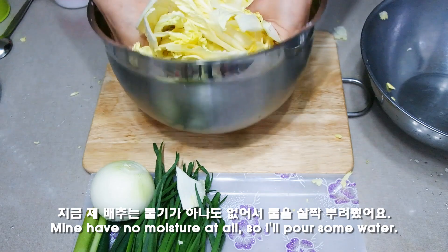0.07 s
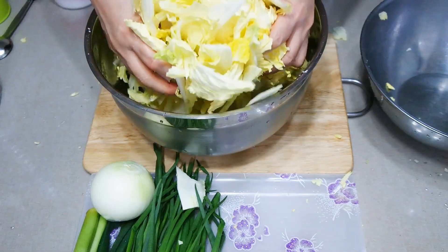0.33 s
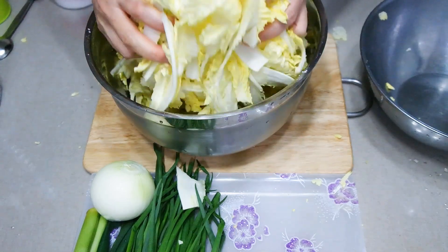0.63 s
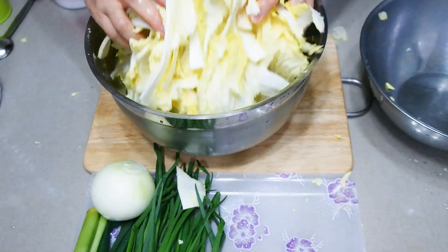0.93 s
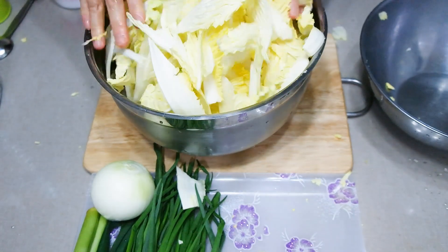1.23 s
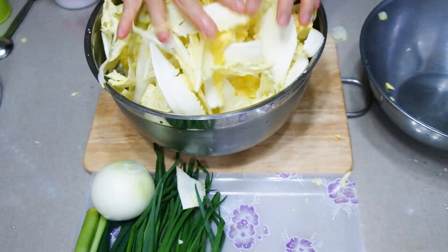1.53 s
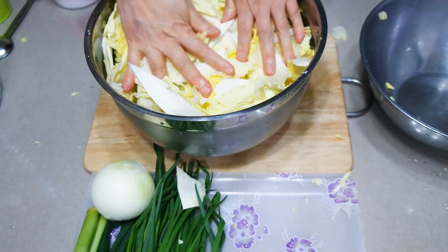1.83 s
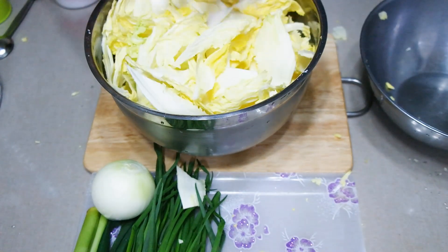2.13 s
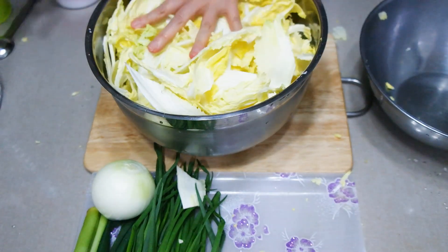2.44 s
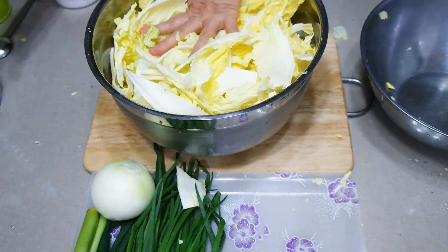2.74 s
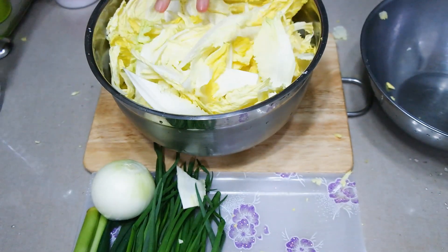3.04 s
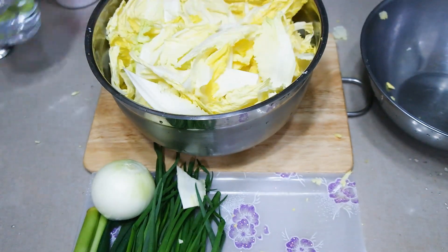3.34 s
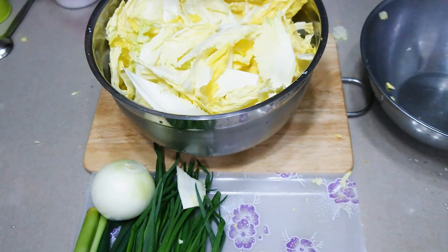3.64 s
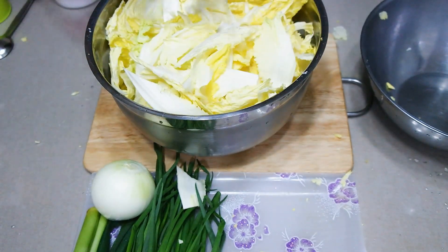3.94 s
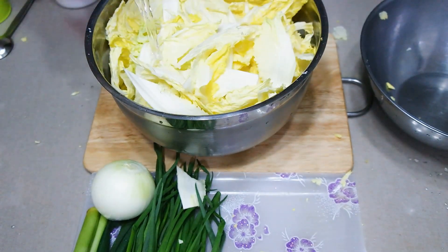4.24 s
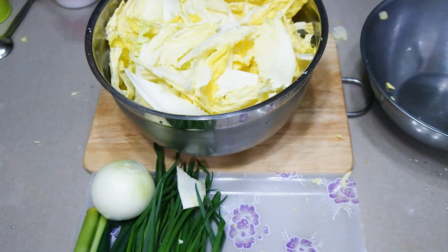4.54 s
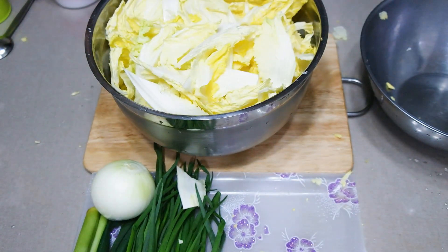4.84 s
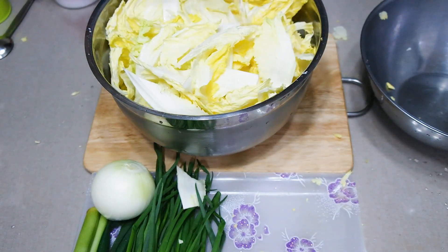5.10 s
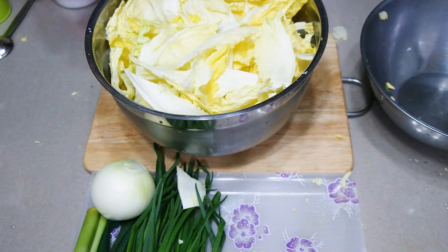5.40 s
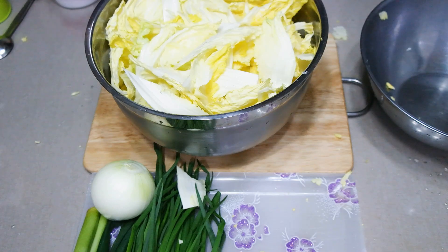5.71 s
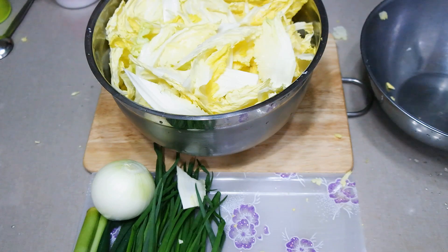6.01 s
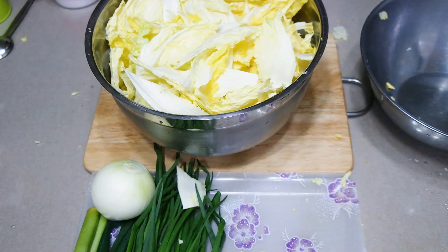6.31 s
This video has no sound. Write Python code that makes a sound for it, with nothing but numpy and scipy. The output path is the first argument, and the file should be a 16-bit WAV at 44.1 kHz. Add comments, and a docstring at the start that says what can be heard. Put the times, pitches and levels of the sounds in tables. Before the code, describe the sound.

Hands toss and press crisp cabbage in a thudding steel bowl, then water patters softly over the leaves and a glass is set down.

```python
"""A small, hard kitchen, heard from near the worktop on two closely spaced microphones.
Hands turn and press cut cabbage in a steel bowl, which thuds on its wooden board; kitchenware clacks,
a cup knocks, and the sound cuts off. Water is dribbled over the leaves, a tub is nudged along
and a glass set down. The walls answer each sound; farther back an appliance hums in the room air."""
import sys
import numpy as np
from scipy import signal
from scipy.fft import rfft, irfft
from scipy.io import wavfile

SR = 44100
rng = np.random.default_rng(int(sys.argv[2]) if len(sys.argv) > 2 else 0)


def store_pcm(level_fs):
    """Save levels as 16-bit WAV."""
    pcm = np.round(np.clip(level_fs, -1, 1) * 32767).astype(np.int16)
    wavfile.write(sys.argv[1], SR, np.atleast_2d(pcm).T)


N = 284974
TIME = np.arange(N) / SR
CUT_S = 3.607

# strokes of the hands: (start [s], rise [s], length [s], level [dB], easing [dB/s], rub over crunch [dB])
HAND_STROKES = [(-0.02, 0.014, 0.06, -36.5, 21.5, -9), (0.062, 0.08, 0.48, -33, 23.5, -9),
                (0.545, 0.028, 0.32, -40.5, -2, -12), (0.857, 0.12, 0.22, -36, -33, -14.5),
                (1.086, 0.021, 0.4, -35, 56.5, -12), (1.585, 0.22, 0.29, -30, 69, -12),
                (1.902, 0.028, 0.14, -35.5, 79, -12.5), (2.323, 0.026, 0.15, -48, 37, -10.5),
                (2.429, 0.069, 0.2, -38, 6, -8.5), (2.611, 0.062, 0.17, -30, 126, -9),
                (2.812, 0.044, .13, -38, 2, -7), (2.973, 0.047, 0.16, -46, 45, -4),
                (3.157, 0.018, 0.054, -43.5, 100, -3.5)]
# leaf ribs snapping: (time [s], relative level [dB], pitch [Hz])
RIB_SNAPS = [(0.597, -23, 6940), (0.835, -25.5, 8200), (1.031, -16.5, 9600), (1.548, -30, 9400),
             (1.857, -20.5, 4180), (2.345, -31, 2860), (2.646, -20, 2100), (2.763, -23.5, 5560),
             (2.843, -22, 1070), (3.053, -31, 5970), (3.084, -23, 7450), (3.094, -26, 11400),
             (3.172, -23.5, 8440), (3.244, -13.5, 12900), (3.404, -20.5, 11370)]
# large drops landing: (time [s], relative level [dB], pitch [Hz])
WATER_DROPS = [(3.86, -40.5, 10000), (3.935, -39, 12550), (3.985, -30, 12800), (4.171, -34, 11800),
               (4.19, -35.5, 6750), (4.349, -37, 4440), (4.667, -30, 13000), (4.827, -27, 11800),
               (4.871, -32.5, 12500), (4.933, -36, 14000), (5.313, -23.5, 9400), (5.386, -35, 4540),
               (5.509, -34.5, 4620), (5.649, -33, 3460)]
# gushes onto the leaves: (start [s], length [s], level [dB], bubbles over patter [dB])
WATER_GUSHES = [(3.846, 1.22, -56.5, -4), (4.14, 0.51, -51, -11.5), (4.304, 0.029, -46.5, -6.5),
                (5.07, 0.66, -45, -9), (5.375, 0.028, -45.5, 0.5), (5.622, 0.04, -47, -0.5)]
# pushes of the tub: (start [s], rise [s], length [s], level [dB])
TUB_PUSHES = [(5.867, 0.11, 0.11, -44.5), (6.04, 0.097, 0.35, -42)]
# squeaks and groans: (time [s], length [s], start pitch [Hz], end pitch [Hz], level [dB], octave [dB])
SQUEAKS = [(0.614, 0.028, 1300, 1616, -45, 4.5), (1.131, 0.32, 1390, 1387, -64, -25),
           (2.433, 0.051, 514, 426, -38, -7), (5.938, 0.042, 622, 714, -48.5, -6),
           (5.953, 0.034, 3230, 3460, -41, -25), (6.02, 0.151, 168.3, 154.3, -46.5, -35),
           (6.065, 0.082, 1325, 1460, -45, -18), (6.093, 0.05, 520, 592, -40, -11)]
# colour of crunching edges, rubbing ribs and splashing water: (frequency [Hz], relative level [dB])
CRUNCH_SPECTRUM = [(700, -45.5), (1200, -16.5), (2200, -7), (3200, -2), (5800, -1.5), (8600, -4),
                   (14400, 0.5), (16000, -7.5)]
RUB_SPECTRUM = [(100, -21.5), (300, -1.5), (460, -1), (700, 3), (2200, 0.5), (3500, -26)]
SPLASH_SPECTRUM = [(600, -15), (2000, -12.5), (3200, -10), (5500, -6), (8000, -6.5), (12000, -3),
                   (16000, -2.5)]
# blows on each object: (time [s], relative level [dB], contact time [ms], rattle decay [ms])
BOWL_BLOWS = [(0.259, -15, 0.62, 9), (0.2805, -5, 0.43, 0.58), (0.2838, -5.5, 0.85, 0.98),
              (0.2995, -13, 0.7, 1.8), (1.7558, -11, 0.33, 0.88), (1.7612, -9, 0.53, 0.9)]
BOARD_BLOWS = [(0.256, -14, 1.8, 3.9), (0.2815, -2.5, 0.54, 1.04), (1.758, -10, 7.5, 0.58),
               (3.118, -25, 0.46, 2.5)]
CLACK_BLOWS = [(3.2518, 0, 0.021, 1.2), (3.2595, -12.5, 0.027, 2.4)]
CUP_BLOWS = [(3.512, -0.17, 0.027, 2.1)]
GLASS_BLOWS = [(6.2555, -20, 0.05, 3.2), (6.2578, -7.5, 0.011, 1.77), (6.2635, -15, 0.088, 5.9)]
TUB_BLOWS = [(5.9635, -26, 0.12, 10), (6.088, -26, 0.14, 10), (6.119, -23, 0.048, 3),
             (6.1725, -25.5, 0.072, 7.4), (6.196, -27, 0.25, 13), (6.451, -30.5, 0.22, 7.6)]
# what each object rings with: (frequency [Hz], relative level [dB], time to fall 60 dB [s])
BOWL_MODES = [(361.3, -4, 0.3), (587, -7.5, 0.11), (698, -8, 0.13), (885, -14, 0.2), (980, -20, 0.12),
              (1314, -7, 0.12), (1390, -0.5, 0.026), (1905, -5.5, 0.06)]
BOARD_MODES = [(207, 0.55, 0.054), (289, 1, 0.042)]
CLACK_MODES = [(720, -7.5, 0.06), (4670, 11, 0.027), (7040, 13, 0.0061), (13150, 6.5, 0.012)]
CUP_MODES = [(790, 6, 0.034), (856, -8, 0.07), (1194, -6.5, 0.077), (1367, -0.5, 0.03)]
GLASS_MODES = [(583, -7.5, 0.058), (800, -6, 0.025), (1184, 2, 0.038), (1970, 1.5, 0.014),
               (2790, -0.5, 0.01), (4680, -8, 0.017), (7200, -8, 0.019)]
TUB_MODES = [(548, -0.5, .07), (726, -1.5, 0.081), (1310, 4, .025), (1900, -1, 0.018), (3480, -4, 0.011)]
# colour of the contact on each object: (frequency [Hz], relative level [dB])
BOWL_CRACK = [(60, -16), (250, -2), (360, 7.5), (1500, -3.5), (3000, -12), (16000, -39)]
BOARD_CRACK = [(30, -9.5), (90, 11), (150, 11), (260, 13.5), (600, 16), (3000, -62)]
CLACK_CRACK = [(50, -27.5), (200, -12), (570, -4.5), (2100, -8.5), (4000, -2.5), (6100, 3), (10500, -5),
               (14000, -2.5)]
CUP_CRACK = [(25, -15.5), (250, -15), (500, -9.5), (790, 9), (1000, -7), (1400, -3.5), (2700, -10.5),
             (15000, -11.5)]
GLASS_CRACK = [(35, -38), (90, -10), (200, -1.5), (420, -9.5), (2100, 6.5), (5500, 1), (8000, 7.5),
               (15000, 5.5)]
TUB_CRACK = [(60, -21), (430, -11.5), (590, 2.5), (920, -8.5), (1380, 0.5), (2700, -5.5), (3400, -1.5),
             (4800, -8), (10000, -13), (15500, -1.5)]
# the appliance's tones and the colour of the room air: (frequency [Hz], relative level [dB])
HUM_TONES = [(180, -66.5), (360, -76.5)]
AIR_SPECTRUM = [(15, -52), (25, -29), (117, -23.5), (180, -18.5), (600, -17.5), (2480, -24.5),
                (16000, -26)]
# the background dips briefly: (time [s], half width [s], depth [dB])
GAIN_DIPS = [(2.3, 0.13, -5.5), (3.8, 0.18, -8.5)]
# the kitchen's reverberation: (frequency [Hz], time to fall 60 dB [s])
ROOM_T60 = [(100, 0.35), (400, 0.29), (1000, 0.38), (4000, 0.41), (8000, 0.3), (16000, 0.2)]
# how alike the room sounds at the two microphones: (frequency [Hz], correlation [-1 to 1])
MIC_CORRELATION = [(100, 0.71), (500, 0.68), (1000, 0.65), (2000, 0.069), (4000, -0.22), (8000, 0.064),
                   (16000, 0.17)]


def leaves():
    """Crisp leaf edges crackle; under pressure the thick ribs rub with a lower voice and stir the bowl."""
    crunch_power, rub_power = np.zeros((2, N))
    for start, rise, length, db, ease_db_per_s, rub_db in HAND_STROKES:
        effort = amp(db) * gesture(start, rise, length, ease_db_per_s, release_db_per_s=180)
        crunch_power += effort ** 2  # strokes that overlap add in power
        rub_power += (effort * amp(rub_db)) ** 2
    edges = grains(1134, 19600, per_s=7000, spread_db=0, clump_db=-0.5, cycles=3.3)
    crunch = convolve(edges, click(CRUNCH_SPECTRUM))
    ribs = grains(130, 2930, per_s=1800, spread_db=0.5, clump_db=3, cycles=2.9)
    rub = unit(convolve(ribs, click(RUB_SPECTRUM)))
    rub += amp(-11.5) * unit(convolve(ribs, ringing(BOWL_MODES)))
    catches = amp(1.5 * drift(50))  # leaves catch on each other and let go
    crunch = amp(1.22) * unit(kitchen(crunch, wet_db=-4, left_db=-0.6) * catches)
    rub = amp(3) * unit(kitchen(rub, wet_db=-2.5, left_db=-1))
    tiny_squeaks = grains(1311, 5495, per_s=77, spread_db=2.5, clump_db=0, cycles=57, count=12)
    crunch += amp(-9.5) * unit(kitchen(tiny_squeaks, wet_db=1))
    return crunch * np.sqrt(crunch_power) + rub * np.sqrt(rub_power)


def snaps():
    """Single ribs break under the fingers, each with a short tearing tick."""
    return kitchen(ticks(RIB_SNAPS, gain_db=10, cycles=3, flurry_ms=1.8), wet_db=-1)


def bowl_on_board():
    """Near the middle of the pair, the steel bowl rings and passes its blows on to the wooden board."""
    bowl = struck(BOWL_BLOWS, BOWL_MODES, BOWL_CRACK, ring_db=-18, crack_db=12)
    board = struck(BOARD_BLOWS, BOARD_MODES, BOARD_CRACK, ring_db=-11.5, crack_db=4.5)
    return kitchen(bowl + board, wet_db=-4, left_db=-0.6, lag_samples=0)


def kitchenware():
    """A little to the left, hard kitchenware meets in a bright double clack."""
    clack = struck(CLACK_BLOWS, CLACK_MODES, CLACK_CRACK, ring_db=-30, crack_db=14.5)
    return kitchen(clack, wet_db=-0.5, left_db=1.5, lag_samples=3)


def cup():
    """A cup takes one hard knock and barely rings."""
    knock = struck(CUP_BLOWS, CUP_MODES, CUP_CRACK, ring_db=-25.5, crack_db=17.5)
    return kitchen(knock, wet_db=-3.5, left_db=0.3, lag_samples=2)


def water():
    """A thin stream breaks into fine patter; where it gushes, small bubbles burst between the leaves."""
    spray = grains(1500, 16000, per_s=1000, spread_db=4, clump_db=2.6, cycles=7, count=40)
    patter = convolve(spray, click(SPLASH_SPECTRUM))
    bubbles = grains(2700, 6300, per_s=350, spread_db=3.2, clump_db=1.5, cycles=16, count=36)
    patter_power, bubble_power = np.zeros((2, N))
    for start, length, db, bubbles_db in WATER_GUSHES:
        flow = amp(db) * gesture(start, 0.27 * length, length, ease_db_per_s=5.5, release_db_per_s=131)
        patter_power += flow ** 2
        bubble_power += (flow * amp(bubbles_db)) ** 2
    patter = unit(kitchen(patter, wet_db=0)) * np.sqrt(patter_power)
    bubbles = unit(kitchen(bubbles, wet_db=0)) * np.sqrt(bubble_power)
    return patter + bubbles


def drops():
    """Large drops tick on the leaves; they sound close, with little room on them."""
    return kitchen(ticks(WATER_DROPS, gain_db=13, cycles=7, flurry_ms=0.6), wet_db=-7)


def glass():
    """A glass is set down with one sharp, briefly rattling knock."""
    landing = struck(GLASS_BLOWS, GLASS_MODES, GLASS_CRACK, ring_db=-12.5, crack_db=16.5)
    return kitchen(landing, wet_db=-3.5, left_db=-0.5)


def tub():
    """A plastic tub knocks when nudged; its foot catches and slips as it is pushed along."""
    nudges = struck(TUB_BLOWS, TUB_MODES, TUB_CRACK, ring_db=-15, crack_db=23)
    catches = grains(388, 8800, per_s=1400, spread_db=3, clump_db=-3, cycles=14, count=24)
    scrape = convolve(catches, click(TUB_CRACK))
    push = sum(amp(db) * gesture(start, rise, length, ease_db_per_s=30, release_db_per_s=160)
               for start, rise, length, db in TUB_PUSHES)
    return kitchen(nudges, wet_db=-3) + unit(kitchen(scrape, wet_db=-0.5)) * push


def squeaks():
    """Rubbed leaves, bowl and tub stick and slip unevenly, making short, rough gliding tones."""
    out = np.zeros(N)
    unsteady = 1 + 0.025 * drift(250)
    for s, length, start_hz, end_hz, db, octave_db in SQUEAKS:
        hz = np.geomspace(start_hz, end_hz, int(length * SR))
        phase = 2 * np.pi * np.cumsum(hz * unsteady[int(s * SR):][:len(hz)]) / SR
        tone = np.sin(phase) + amp(octave_db) * np.sin(2 * phase)
        add(out, s, amp(db) * signal.windows.tukey(len(hz), 0.4) * tone)
    return kitchen(out, wet_db=-2.5)


def background():
    """Room air and a wavering hum; their level dips briefly twice and steps up where the tossing breaks off."""
    air = amp(-56.5) * unit(convolve(diffuse(N), click(AIR_SPECTRUM)))
    waver = 0.13 * drift(11)
    hum = sum(amp(db) * unit(np.sin(2 * np.pi * hz * TIME + waver)) for hz, db in HUM_TONES)
    hum *= amp(drift(11))
    step_db = np.where(TIME < CUT_S, -1, 3)
    dips_db = sum(db * np.exp(-((TIME - s) / width) ** 2) for s, width, db in GAIN_DIPS)
    return (air + hum) * amp(step_db + dips_db)


def kitchen(x, wet_db, left_db=0, lag_samples=1, size=22050):
    """Direct sound, lagging at the right microphone, and a dense tail that dies band by band."""
    hz, t, bands = signal.stft(diffuse(size), SR, nperseg=256)
    decay = amp(-60 * t / read(ROOM_T60, hz)[:, None])
    tail = signal.istft(bands * decay, SR, nperseg=256)[1]
    tail *= 1 - np.exp(-(np.arange(tail.shape[1]) / SR / 0.0004) ** 2)  # swells in over 0.4 ms
    response = amp(wet_db) * tail / np.linalg.norm(tail[0])
    response[0, 0] += amp(left_db / 2)
    response[1, lag_samples] += amp(-left_db / 2)
    return convolve(x, response)


def diffuse(size):
    """Noise from all sides on two close microphones: alike in the lower bands only."""
    mid, side = rfft(rng.standard_normal((2, size)))
    correlation = read(MIC_CORRELATION, np.fft.rfftfreq(size, 1 / SR))
    mid *= np.sqrt((1 + correlation) / 2)
    side *= np.sqrt((1 - correlation) / 2)
    return irfft(np.array([mid + side, mid - side]), size)


def struck(blows, modes, crack, ring_db, crack_db):
    """Blows crack against an object and set its modes ringing; a longer contact is duller."""
    out = np.zeros(N)
    body = amp(ring_db) * ringing(modes)
    add(body, 0, amp(crack_db) * click(crack))
    for s, db, contact_ms, rattle_ms in blows:
        rattled = signal.fftconvolve(body, flurry(rattle_ms))
        pole = np.exp(-np.pi * 1000 / (contact_ms * SR))
        add(out, s, amp(db) * signal.lfilter([1 - pole], [1, -pole], rattled))
    return out


def ringing(modes, size=13000):
    """An object's modes dying away after one tap."""
    t = np.arange(size) / SR
    return sum(amp(db - 60 * t / t60) * np.sin(2 * np.pi * hz * t) * (-1) ** k
               for k, (hz, db, t60) in enumerate(modes))


def ticks(rows, gain_db, cycles, flurry_ms):
    """Each tick is a brief flurry ringing for a few cycles; so small a source radiates little bass."""
    out = np.zeros(N)
    for s, db, hz in rows:
        ring = np.diff(grain(hz, cycles))
        ring /= np.linalg.norm(ring)
        add(out, s, amp(db + gain_db) * signal.fftconvolve(flurry(flurry_ms), ring))
    return out


def flurry(ms, size=4096):
    """Countless tiny contacts dying within some ms, even in spectrum."""
    burst = rfft(rng.standard_normal(size) * np.exp(-np.arange(size) * 1000 / (SR * ms)))
    return irfft(burst / abs(burst))[:size // 2]


def grains(lo_hz, hi_hz, per_s, spread_db, clump_db, cycles, count=18):
    """A shower of grains at count pitches, its level swelling in clumps."""
    out = np.zeros(N)
    for hz in np.geomspace(lo_hz, hi_hz, count):
        sizes = amp(spread_db * np.minimum(rng.exponential(1, N), 4.5))
        arrivals = rng.random(N) < per_s / count / SR
        out += signal.oaconvolve(sizes * arrivals, grain(hz, cycles) * np.sqrt(hz))[:N]
    return out * amp(clump_db * drift(60))


def grain(hz, cycles, size=512):
    """A tiny burst ringing for a few cycles, energy 1."""
    turns = np.arange(size) * min(hz, SR / 2.5) / SR
    ring = np.sin(2 * np.pi * turns) * np.exp(-np.pi * turns / cycles)
    return ring / np.linalg.norm(ring)


def click(spectrum, size=2048):
    """A minimum-phase click with the given spectrum, energy 1."""
    hz = abs(np.fft.fftfreq(size, 1 / SR))
    log_gain = np.log(amp(read(spectrum, hz)))
    pulse = np.fft.ifft(np.exp(np.conj(signal.hilbert(log_gain)))).real[:size // 2]
    return pulse / np.linalg.norm(pulse)


def gesture(start, rise, length, ease_db_per_s, release_db_per_s):
    """Gain of one movement: it builds up, eases off (or grows, if easing is negative), then dies away."""
    t = TIME - start
    fall_db = ease_db_per_s * np.maximum(t - rise, 0) + release_db_per_s * np.maximum(t - length, 0)
    return np.clip(t / rise, 0, 1) * amp(-fall_db)


def drift(hz):
    """Random wandering slower than hz, rms 1."""
    slow = np.fft.rfftfreq(N, 1 / SR) < hz
    return unit(irfft(rfft(rng.standard_normal(N)) * slow, N))


def amp(db):
    """Decibels to gain."""
    return 10 ** (np.asarray(db) / 20)


def unit(x):
    """Scales to rms 1."""
    return x / np.sqrt(np.mean(x ** 2) + 1e-20)


def read(points, hz):
    """Reads a curve on a log-frequency axis."""
    point_hz, values = np.transpose(points)
    return np.interp(np.log(hz + 1), np.log(point_hz + 1), values)


def add(mix, s, sound):
    """Mixes a sound in at time s."""
    part = mix[max(round(s * SR), 0):][:len(sound)]
    part += sound[:len(part)]


def convolve(x, response):
    """Passes mono or stereo sound through a response."""
    return signal.fftconvolve(np.atleast_2d(x), np.atleast_2d(response), axes=1)[:, :N]


def scene():
    """The sound cuts off abruptly, reverberation included; then come the water and the tidying."""
    tossing = leaves() + snaps() + bowl_on_board() + kitchenware() + cup()
    return tossing * (TIME < CUT_S) + water() + drops() + glass() + tub() + squeaks() + background()


def record(dry):
    """Behind the microphones the sharpest peaks are rounded off; then a steep band limit."""
    ceiling, edge_hz = 0.8, 16150
    rounded = ceiling * np.tanh(dry / ceiling)
    lowpass = signal.firwin(511, edge_hz, window=("kaiser", 9), fs=SR)
    return signal.oaconvolve(rounded, lowpass[None], "same")


dry = scene()
out = record(dry)
store_pcm(out)
```